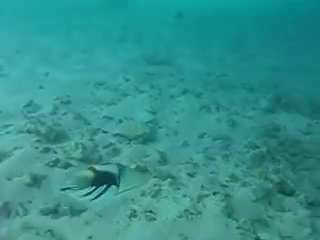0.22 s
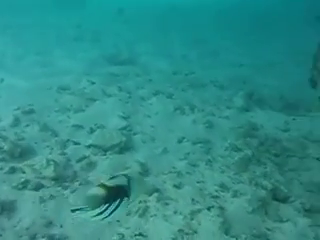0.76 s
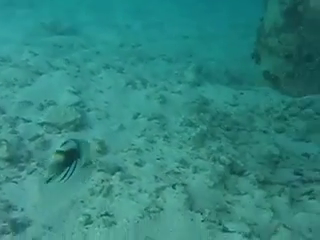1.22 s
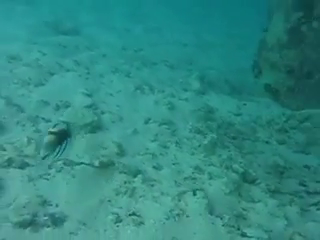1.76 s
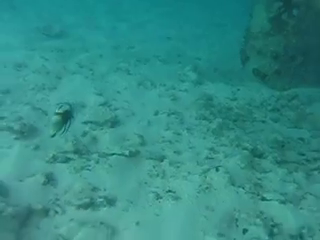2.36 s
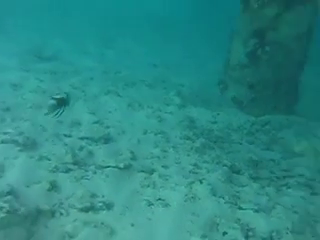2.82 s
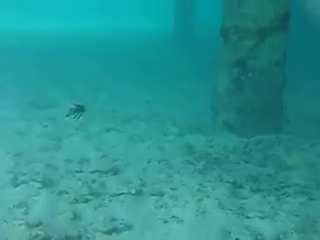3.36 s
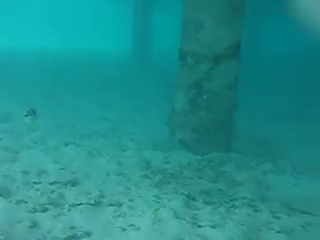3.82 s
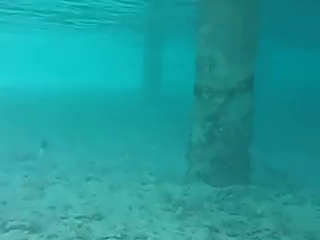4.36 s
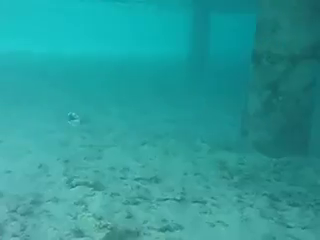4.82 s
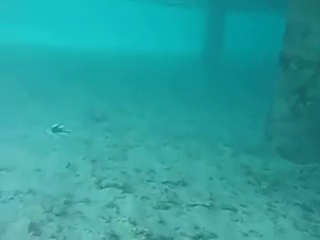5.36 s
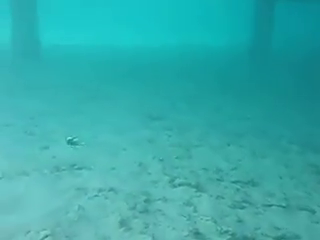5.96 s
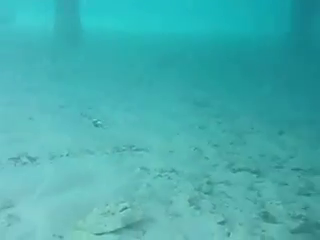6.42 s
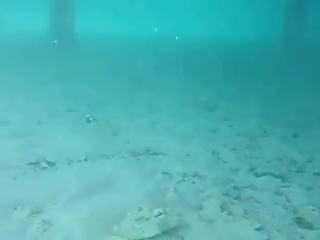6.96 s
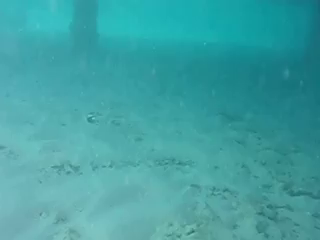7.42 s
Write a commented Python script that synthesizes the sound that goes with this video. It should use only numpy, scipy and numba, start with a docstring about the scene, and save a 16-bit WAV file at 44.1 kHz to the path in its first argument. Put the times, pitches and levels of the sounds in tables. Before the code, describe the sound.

Muffled underwater gurgling and hollow knocks boom inside a sealed camera case, with sparse sharp shrimp ticks over steady hiss and a loud juddering burst late.

```python
"""Sealed camera over a shallow sea bed

A small camera in a sealed case drifts in washing water, held by a hand. Filtered noise and random pushes
make the wash, and the air space in the case booms near 470 Hz. Short fading tones make the soft throbs,
knocks, low thumps, one clack and mid-pitched pops. Shrimp snaps are ticks of a few cycles, over a steady hiss.
The microphone chain loses bass and treble, turns loud moments down and flattens the peaks that remain.
"""
import sys
import numpy as np
from scipy import signal
from scipy.fft import rfft, irfft
from scipy.io import wavfile
from scipy.ndimage import uniform_filter1d
from numba import njit

SR = 44100
rng = np.random.default_rng(int(sys.argv[2]) if len(sys.argv) > 2 else 0)


def bounce(signal):
    """Save signal as a 16-bit WAV file at the path given by the first command-line argument."""
    frames = np.transpose(np.atleast_2d(signal))
    limited = np.clip(frames, -1, 1)
    pcm = np.round(limited * 32767).astype(np.int16)
    wavfile.write(sys.argv[1], SR, pcm)


def boost(x):
    """Linear amplitude factor 10**(x/20) for a level x in decibels (scalar or array-like)."""
    u = np.asarray(x, float) / 20
    return 10 ** u


N = 339570  # length in samples
T = np.arange(N) / SR  # time in seconds
TOP_HZ = 4150  # where the steep treble filter cuts

# steady hiss of sea and microphone, its tone colour: pitch_hz, relative level_db
HISS_COLOUR = [(60, -3.5), (120, 3), (300, 9), (900, 0), (2000, 8.5), (3500, 6), (4200, -6)]
# shrimp snaps: start_s, peak level_db
SHRIMP_SNAPS = [(0.0983, -18.5), (0.255, -19.5), (2.087, -18.5), (2.5057, -18.5), (2.853, -31),
                (2.895, -18), (3.536, -18.5), (3.5622, -20), (3.792, -25.5), (3.7956, -30), (3.8895, -18.5),
                (4.1175, -31.5), (4.2143, -19.5), (5.3163, -19), (5.871, -27.5), (5.9507, -27),
                (6.7535, -19), (6.8039, -18)]
# short mid-pitched pops, small bubbles and the bright part of some knocks: start_s, peak level_db, pitch_hz
MID_POPS = [(0.1443, -17, 1120), (0.2132, -28, 1050), (0.39, -22.5, 2200), (0.4446, -11.5, 1230),
            (0.682, -32, 1290), (0.831, -9, 1320), (0.884, -23, 1360), (0.972, -31.5, 1700),
            (1.019, -31.5, 1690), (2.1201, -23.5, 1810), (1.823, -25.5, 1340), (2.5637, -23, 1150),
            (2.565, -28, 2150), (2.76, -28, 1350), (2.602, -22.5, 1430), (2.837, -25.5, 1440),
            (3.1263, -28, 2340), (3.2012, -29, 1120), (3.4125, -27.5, 1490), (3.825, -7, 910),
            (4.126, -14, 955), (4.3087, -25, 1180), (4.447, -24, 1170), (4.598, -11.5, 1356),
            (4.817, -9, 1370), (5.8667, -22.5, 1320), (6.6444, -14, 1282)]
# soft booming throbs of the case, sloshes and from 6.35 s a hand juddering on it:
# start_s, peak level_db, starting pitch_hz, fade by 60 dB in t60_s
CASE_THROBS = [(0.857, -13.5, 524, 0.058), (0.92, -15.5, 513, 0.13), (1.81, -3.5, 498, 0.081),
               (1.986, -11, 447, 0.066), (2.46, -10, 425.3, 0.12), (2.822, -10, 465, 0.1),
               (3.063, -5.5, 437, 0.095), (3.125, -7.5, 510, 0.093), (5.745, -10, 476, 0.23),
               (5.175, -13.5, 473, 0.079), (5.4, -10, 451, .15), (6.35, -1, 427.3, .08),
               (6.395, 1, 456.5, .1), (6.45, 1, 456, .08), (6.52, 1, 473.5, .08), (6.553, -3, 470, .06),
               (6.6, 0, 468.6, .06), (6.672, -3, 480, .06), (6.7, -2, 481, .06), (6.75, -0.5, 489, 0.087),
               (7.545, -9.5, 330, 0.072), (7.59, -16, 330, 0.076)]
# low thumps of the case, mostly under its knocks: start_s, peak level_db, pitch_hz
CASE_THUMPS = [(0.138, -4.5, 241), (0.438, -10, 298.5), (0.473, -18, 300), (1.822, -13, 250),
               (2.462, -24.5, 173), (3.608, -6.5, 241.4), (3.73, -5.5, 284.3), (3.78, -10, 206),
               (4.575, -15, 196), (4.634, -6, 244.5), (4.692, -8.5, 205), (4.726, -6, 241),
               (4.775, -6, 192), (4.813, -12, 273), (5.098, -16.5, 274), (5.791, -23, 108),
               (7.481, -18.5, 225)]
# rings of one hard clack on the case: pitch_hz, peak level_db, t60_s
CLACK_RINGS = [(470, 0.5, 0.036), (642, -3, 0.036), (1721, 0, 0.022), (2860, -2, 0.011)]
# knocks and glugs on the case: start_s, peak level_db of the boom, glug level_db against the boom
CASE_KNOCKS = [(0.036, -12.5, -20), (0.069, -17, -30), (0.145, -2, -13), (0.343, -15.5, -11.5),
               (0.444, 1, -20), (0.481, -8.5, -31), (0.523, -14, -15), (0.752, -11.5, -10.5),
               (0.83, -1, -15), (0.883, -4.5, -9), (0.977, -11.5, -15), (1.022, -13, -21),
               (1.102, -16.5, -17), (1.282, -22.5, -8), (1.378, -16.5, -15), (1.462, -19, -16),
               (1.535, -13, -1), (1.624, -8, -15), (1.721, -18.5, -13), (1.812, -9.5, -4.5),
               (2.042, -10.5, -40), (2.568, -9.5, -10), (2.754, -8.5, -14.5), (2.917, -9, -17),
               (3.277, -8.5, -19), (3.611, -1, -12), (3.733, 1.5, -10), (3.78, -10.5, -8),
               (3.823, 0, -12.5), (3.988, -19, -19.5), (4.039, -8.5, -25), (4.13, -5.5, -20),
               (4.2, -14.5, -25), (4.597, -2, -9.5), (4.636, -4.5, -18.5), (4.663, -7, -16),
               (4.695, -6, -15), (4.719, -10, -9), (4.733, 0, -20), (4.778, -1.5, -22), (4.816, -1, -21),
               (5.015, -15, -33), (5.104, -1.5, -26), (6.063, -3.5, -19), (7.009, -5, -31),
               (7.12, -4.5, -20.5), (7.422, -8.5, -10.5), (7.484, -11.5, -14.5)]
# rings of the air space in the case: pitch_hz, relative level_db, t60_s
CASE_RINGS = [(328, -22, 0.05), (422.7, 0.5, .04), (477.6, 14.5, 0.026), (524, -13.5, 0.0086),
              (670.5, -3.5, 0.06), (785, -30.5, 0.0092)]
# rings of the case walls: pitch_hz, relative level_db, t60_s
WALL_RINGS = [(1137, -8.5, 0.022), (1355, 0, 0.018), (1507, -3.5, 0.023), (1996, -12, 0.027),
              (2446, -7, 0.016), (3480, -23, .008)]
# surges of water over the case: start_s, length_s, boom level_db at the start,
# swell_db_per_s, walls level_db against the boom
WATER_SURGES = [(0.0, 0.516, -32, -4.5, -28), (0.713, 0.21, -23.5, 14, -19), (0.948, .42, -33, -26, -25.5),
                (1.454, 0.2, -32.5, 15, -16.5), (1.767, 0.58, -21, -17, -28.5),
                (2.337, 0.21, -24.5, 29, -34), (2.723, 0.13, -23.5, -0.5, -29.5),
                (2.926, 0.37, -18, -4.5, -35.5), (3.403, 0.63, -27.5, -7, -25.5),
                (3.953, 0.19, -26.5, 50, -28), (4.436, 0.821, -27, 8, -32), (5.322, 0.29, -13.5, 3, -29.5),
                (5.658, .22, -14.5, 0.5, -28), (6.029, 0.15, -15, 24.5, -23.5), (6.159, 0.57, -7, -7, -25),
                (6.929, 0.46, -19, -17, -27), (7.471, 0.14, -16.5, -12.5, -36.5)]
# how lumpy the water is: time_s, grit from 0 to 1
WATER_GRIT = [(0, .7), (.9, 1), (3.1, .5), (4.8, .9), (5.3, .1), (6.3, .05), (6.75, 0.4), (7.1, .05),
              (7.7, .3)]


def unit(x):
    """Scales a sound to an average strength (rms) of 1."""
    return x / np.sqrt(np.mean(x ** 2))


def fade(t, t60):
    """Dies away by 60 dB in t60 seconds, like a damped ring."""
    return np.exp(-np.log(1000) * t / t60)


def band(x, low_hz, high_hz, order):
    """Keeps the pitches between two limits; a higher order cuts more steeply."""
    return signal.sosfilt(signal.butter(order, [low_hz, high_hz], "bandpass", fs=SR, output="sos"), x)


def blip(hz, t60, rise, glide=0.):
    """A damped ring, 1/8 s at most, builds up over rise seconds; pitch climbs by 2 * glide of hz per second."""
    t = T[:SR // 8]
    tone = np.sin(2 * np.pi * hz * t * (1 + glide * t))
    return tone * fade(t, t60) * (1 - np.exp(-t / rise))


def ring(modes):
    """A sharp blow sets off all the natural tones of a body at once; each dies away at its own speed."""
    t = T[:SR // 8]
    return sum(boost(db) * np.sin(2 * np.pi * hz * t) * fade(t, t60) for hz, db, t60 in modes)


def walk(rate):
    """A random level that slides to a new value rate times a second, with a spread of 1."""
    hold = int(SR / rate)
    steps = np.repeat(rng.standard_normal(N // hold + 1), hold)
    return unit(uniform_filter1d(steps, hold)[:N])


def grains(rate, spread_db):
    """Scattered pushes of either sign, about rate per second; a few are much bigger than the rest."""
    when = rng.random(N) < rate / SR
    sign = rng.choice([-1., 1.], N)
    size = boost(spread_db * np.minimum(rng.exponential(size=N), 3.5))
    return unit(when * sign * size)


def add(out, s, db, sound):
    """Lays a sound into out at s seconds, with its peak at db."""
    i = int(s * SR)
    part = sound[:N - i]
    out[i:i + len(part)] += boost(db) * part / np.abs(sound).max()


def hiss():
    """Sea and microphone give a smooth noise, made by colouring random noise by pitch."""
    hz, db = np.transpose(HISS_COLOUR)
    f = np.fft.rfftfreq(N, 1 / SR) + 1  # the 1 avoids log(0)
    colour = boost(np.interp(np.log(f), np.log(hz), db)) * (f < 2 * TOP_HZ)
    noise = irfft(rfft(rng.standard_normal(N)) * colour, N)
    return boost(-50.5) * unit(noise)


def snaps():
    """A shrimp snap arrives as a tick of a few cycles; far ones make a faint crackle."""
    tick = blip(3417, t60=0.0044, rise=0.00046)
    crackle = signal.fftconvolve(grains(80, 5.1), tick)[:N]
    out = boost(-58.5) * unit(crackle)
    for s, db in SHRIMP_SNAPS:
        add(out, s, db, tick)
    return out


def pops():
    """Small bubbles, and the bright part of some knocks, ring briefly, each at its own pitch."""
    out = np.zeros(N)
    for s, db, hz in MID_POPS:
        add(out, s, db, blip(hz, t60=0.014, rise=0.00009))
    return out


def throbs():
    """Each throb of the case swells softly over some cycles and rings out, its pitch creeping up."""
    out = np.zeros(N)
    for s, db, hz, t60 in CASE_THROBS:
        add(out, s, db, blip(hz, t60, rise=0.0071, glide=0.6))
    return out


def thumps():
    """The case thumps low, mostly under its knocks: a low tone that fades quickly."""
    out = np.zeros(N)
    for s, db, hz in CASE_THUMPS:
        add(out, s, db, blip(hz, t60=0.028, rise=0.0014))
    return out


def clack():
    """One hard clack sets off several rings of the case together."""
    out = np.zeros(N)
    for hz, db, t60 in CLACK_RINGS:
        add(out, 4.3443, db, blip(hz, t60, rise=0.00052))
    return out


def knocks():
    """A push of a few cycles rings the case with a dry crack, and a bubble glugs above it."""
    out = np.zeros(N)
    boom = signal.fftconvolve(ring(CASE_RINGS), blip(459.4, t60=0.011, rise=0.0014))
    burst = rng.standard_normal(SR // 100) * fade(T[:SR // 100], 0.01)
    crack = signal.fftconvolve(burst, blip(1000, t60=0.004, rise=0.0002))
    crack = band(crack, 600, 2600, order=2)
    glug_hz = 720 * np.exp(0.094 * rng.standard_normal(len(CASE_KNOCKS)))
    for (s, db, glug_db), hz in zip(CASE_KNOCKS, glug_hz):
        add(out, s, db, boom)
        add(out, s + 0.002, db - 21, crack)
        add(out, s, db + glug_db, blip(hz, t60=0.033, rise=0.0014, glide=1.6))
    return out


def gurgle(hz, spread, width_hz):
    """Pockets of water slosh: noise in a narrow band whose pitch wanders about hz."""
    slosh = signal.lfilter(*signal.butter(2, width_hz, fs=SR), rng.standard_normal((2, N)))
    phase = 2 * np.pi * np.cumsum(hz * np.exp(spread * walk(24))) / SR
    return unit(slosh[0] * np.cos(phase) + slosh[1] * np.sin(phase))


def bubbles(count, hz, spread, cycles):
    """Pockets of air shift against the case: short rings of scattered pitch that glide up."""
    out = np.zeros(N)
    for when, pitch, size in rng.random((count, 3)):
        f = hz * np.exp(spread * (2 * pitch - 1))
        add(out, when * T[-1], -16 * size, blip(f, t60=cycles / f, rise=0.0024, glide=4.0))
    return unit(out)


def surges():
    """Each surge sets in quickly, swells or sags, then dies away; gives the gains of boom and walls."""
    attack_s, release_t60_s = 0.05, 0.55
    # the calm water between surges; powers are added up
    boom_power, wall_power = boost(-34.5) ** 2, boost(-57.5) ** 2
    for s, length, db, swell_db, wall_db in WATER_SURGES:
        t = T - s
        onset = np.clip(t / attack_s, 0, 1)
        swell = boost(db + swell_db * np.clip(t, 0, length))
        gain = onset * swell * fade(np.maximum(t - length, 0), release_t60_s)
        boom_power = boom_power + gain ** 2
        wall_power = wall_power + (gain * boost(wall_db)) ** 2
    return np.sqrt(boom_power), np.sqrt(wall_power)


def rumble(boom_gain):
    """Low random pushes and noise; they follow the wash only in part."""
    pushes = grains(45, 6.6) + 0.6 * rng.standard_normal(N)
    return boost(-35) * boom_gain ** 0.27 * unit(band(pushes, 110, 400, order=2))


def wash():
    """Gurgles and lumpy eddies push on the case; the boom and the walls answer, small bubbles chirp."""
    boom_gain, wall_gain = surges()
    grit = np.interp(T, *np.transpose(WATER_GRIT))
    lumps = grains(70, 6.4)

    eddies = unit(band(rng.standard_normal(N) + 1.1 * grit * lumps, 312.5, 732, order=3))
    pockets = bubbles(count=260, hz=495.8, spread=0.4, cycles=17.0)
    eddies = eddies + 0.92 * gurgle(455, 0.08, 45) + 1.02 * grit * pockets
    eddies = boost(1.1 * walk(40)) * eddies  # the level wavers
    boom = unit(signal.fftconvolve(eddies, ring(CASE_RINGS))[:N])

    # the same lumps that jolt the air space tick on the walls
    scrape = np.sqrt(1 - grit) * rng.standard_normal(N) + np.sqrt(grit) * lumps
    walls = signal.fftconvolve(scrape, ring(WALL_RINGS))[:N]
    walls = unit(band(walls, 780, 3100, order=2))
    fizz = grit * bubbles(count=110, hz=1150., spread=0.65, cycles=30.)
    return boom_gain * boom + wall_gain * (walls + 0.7 * fizz) + rumble(boom_gain)


def scene():
    """Adds up everything the sealed microphone picks up, as one channel."""
    background = hiss() + snaps() + pops()
    case_sounds = throbs() + thumps() + clack() + knocks()
    return (background + case_sounds + wash())[None]


@njit
def follow(x, attack, release):
    """Tracks how loud the sound is: quick up, slow down."""
    level, out = 0., np.empty(len(x))
    for i in range(len(x)):
        speed = attack if abs(x[i]) > level else release
        level += (abs(x[i]) - level) * speed
        out[i] = level
    return out


def roll_off(x):
    """The treble ends steeply here."""
    return signal.sosfilt(signal.butter(12, 16510, fs=SR, output="sos"), x)


def record(dry):
    """The microphone drops the bass, a steep filter the top; a gain control leans on loud moments,
    and what it misses clips flat and sprays treble."""
    thin = signal.sosfilt(signal.butter(2, 100, "highpass", fs=SR, output="sos"), dry)
    narrow = signal.sosfilt(signal.cheby1(10, 0.5, TOP_HZ, fs=SR, output="sos"), thin)

    attack_s, release_s = 0.0045, 0.048
    level = follow(narrow[0], 1 / (attack_s * SR), 1 / (release_s * SR))
    held = narrow * np.minimum(0.35 / (level + 1e-9), 1) ** 0.52  # acts above a level of 0.35

    ceiling, knee = 0.71, 19  # a higher knee bends more sharply into the ceiling
    flat = held / (1 + np.abs(held / ceiling) ** knee) ** (1 / knee)
    mix = flat - 0.0028  # the whole wave sits slightly below zero
    return roll_off(mix)


dry = scene()
out = record(dry)
bounce(out)
```